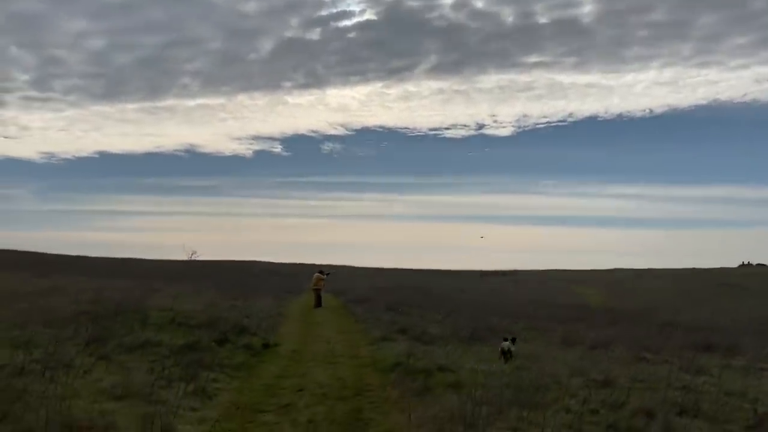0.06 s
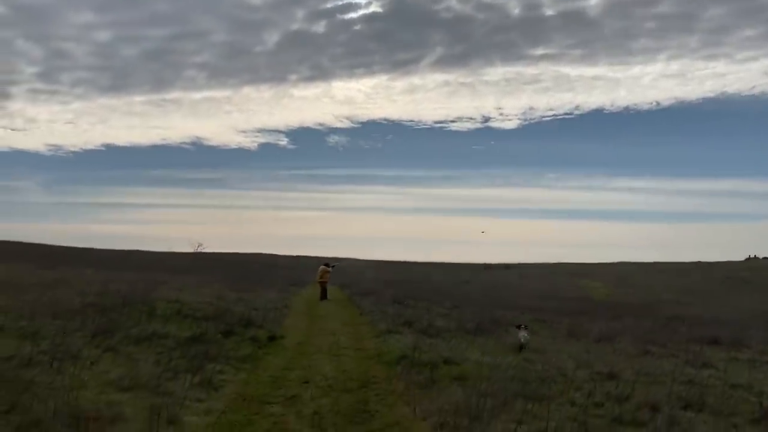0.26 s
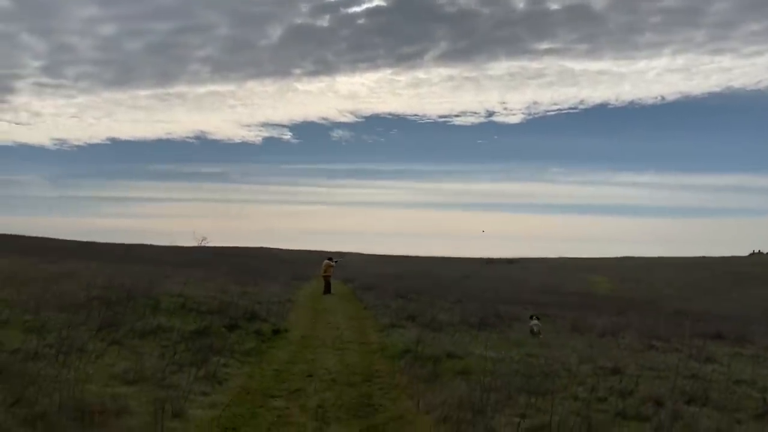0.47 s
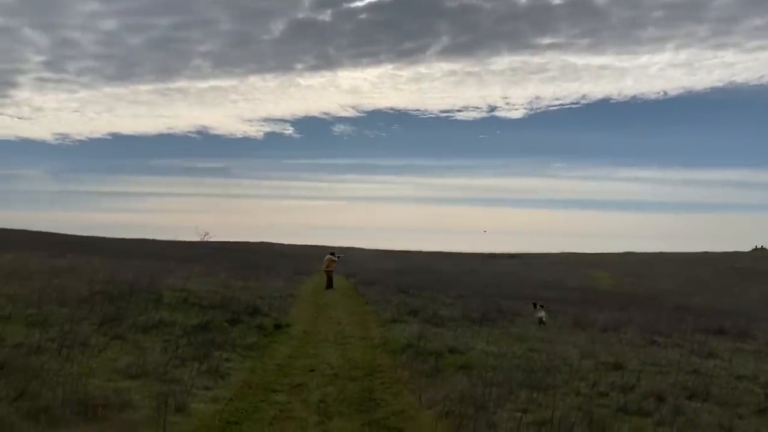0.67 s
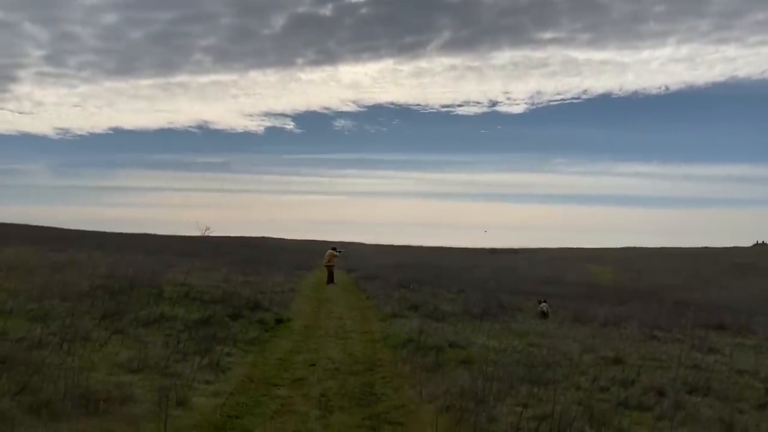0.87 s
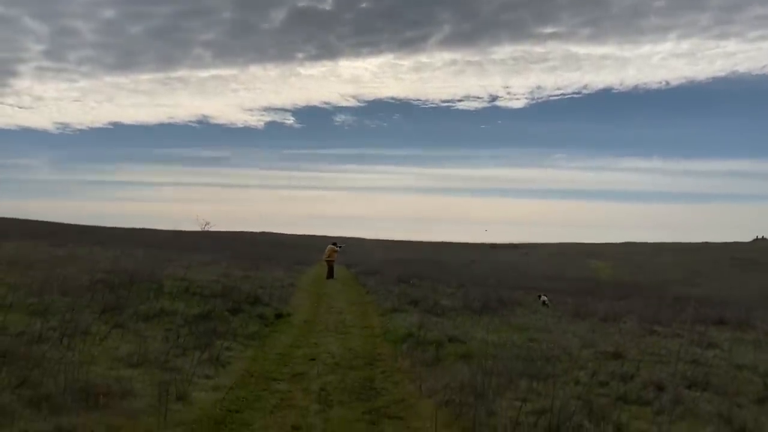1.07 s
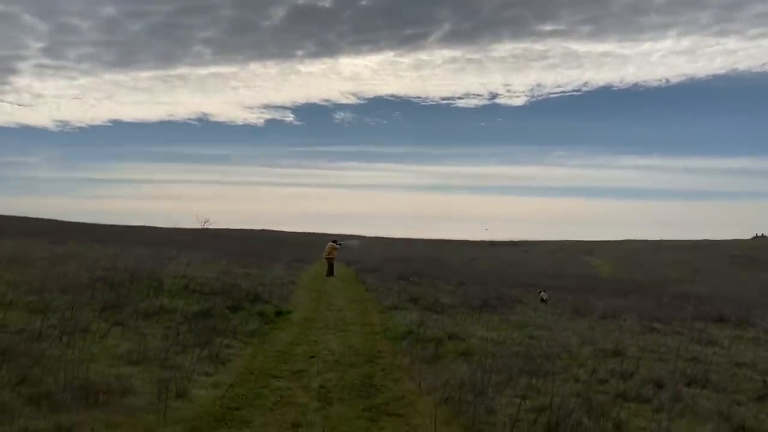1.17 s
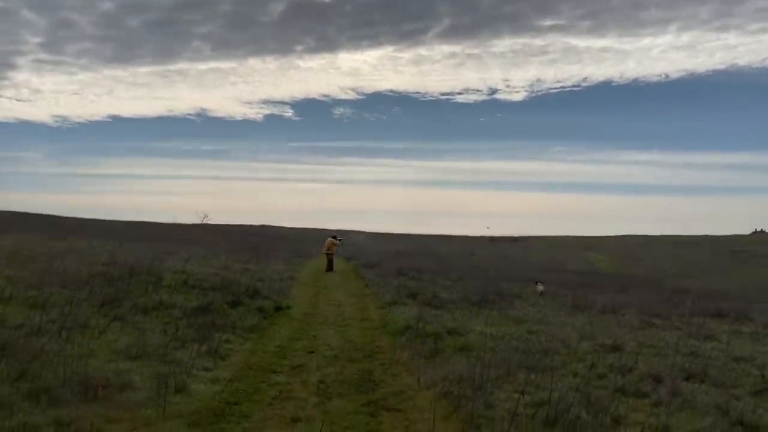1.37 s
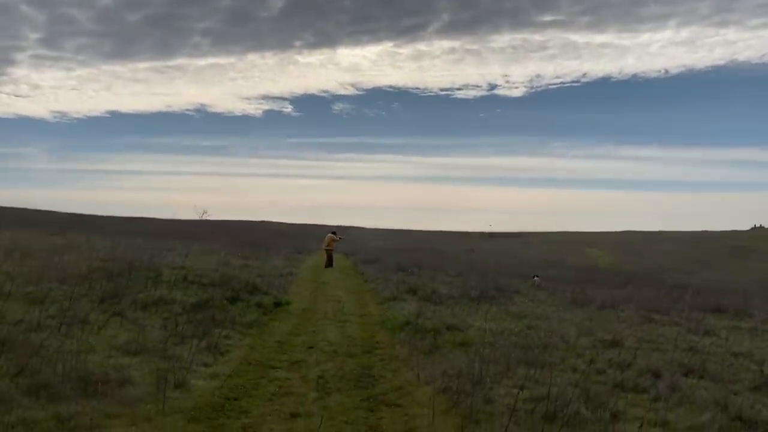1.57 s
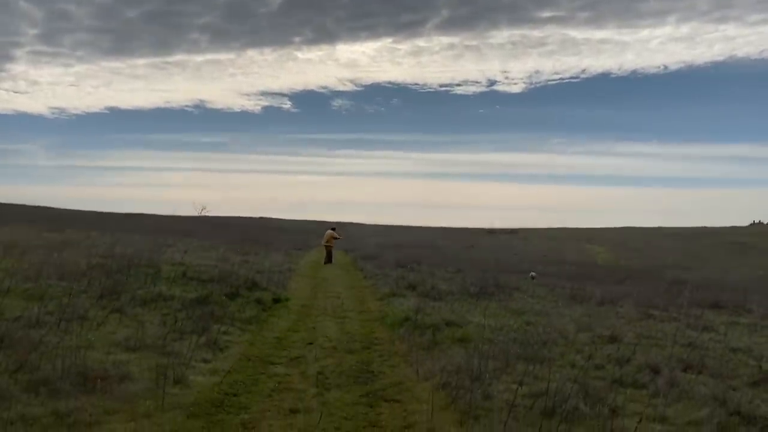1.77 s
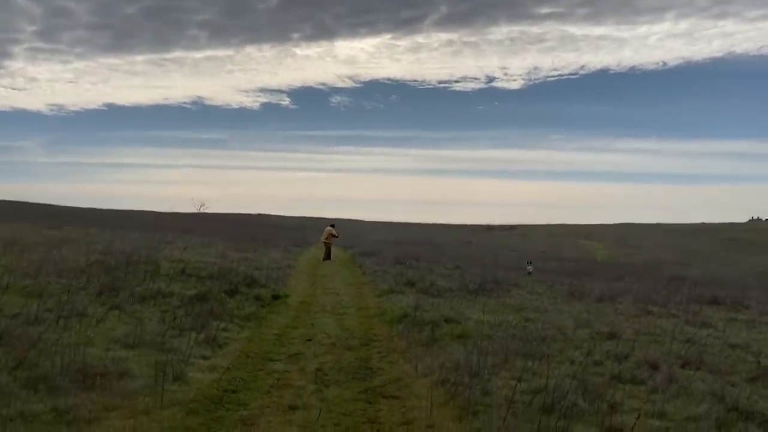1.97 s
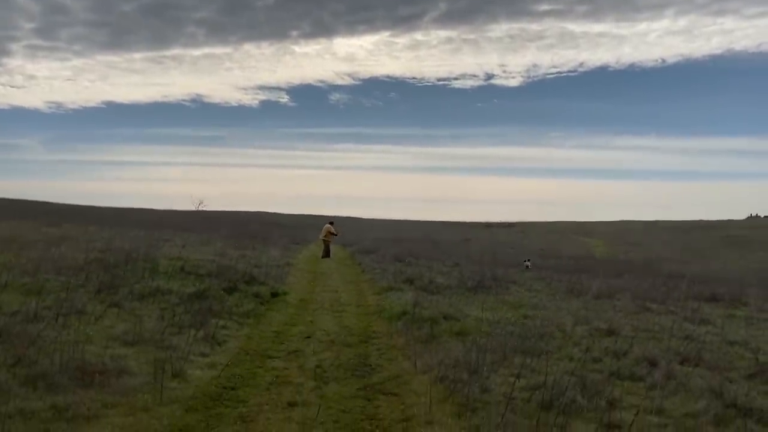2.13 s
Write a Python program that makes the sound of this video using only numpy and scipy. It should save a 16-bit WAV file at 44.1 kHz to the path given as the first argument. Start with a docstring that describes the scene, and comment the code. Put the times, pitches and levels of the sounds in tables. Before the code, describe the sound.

Two shotgun blasts, about one second apart, some tens of metres away in open grassland; each sharp crack and short low boom fades into hiss and faint echoes, with light wind on a small stereo recorder.

```python
"""Open grassland: two shotgun blasts some tens of metres away, heard by a small stereo recorder.
Each is a pressure pulse, a crack of shaped noise and a chirp-like boom that falls in pitch; swelling
narrow-band noise precedes it. Decaying noise gives the hiss from grass, low rumble and dull roll; short noise
bursts give the slap echoes. Low noise in lumps makes the wind on the microphones; filtered noise makes the
murmur, rustles and ticks."""
import sys
import numpy as np
from scipy import signal
from scipy.fft import rfft, irfft
from scipy.io import wavfile
from scipy.ndimage import uniform_filter1d

SR = 44100
rng = np.random.default_rng(int(sys.argv[2]) if len(sys.argv) > 2 else 0)


def invert_db(x):
    """Field ratio 10**(x/20) for x, a level in decibels (scalar or array-like)."""
    u = np.asarray(x, float) / 20
    return 10 ** u


def int16_out(signal):
    """Quantize to a 16-bit WAV file."""
    q = np.round(np.clip(np.atleast_2d(signal).T, -1, 1) * 32767)
    wavfile.write(sys.argv[1], SR, q.astype(np.int16))


N = 97020  # samples
OPPOSED = np.array([[1], [-1]])  # signs of the opposed part, left and right


def bins():
    """Discrete Fourier analysis: the bin frequencies in Hz, raised by 1 to avoid zero."""
    return np.fft.rfftfreq(N, 1 / SR) + 1


def colour(x, table):
    """Linear filtering: weight the spectrum by (Hz, dB) points joined on a log frequency axis."""
    hz, db = np.array(table, float).T
    weight = invert_db(np.interp(np.log(bins()), np.log(hz), db))
    return irfft(rfft(x) * weight, N)


def band(x, hz, width_hz):
    """Resonance: the magnitude response of one resonator applied twice, without phase shift."""
    f = bins()
    detuning = (f - hz ** 2 / f) / width_hz
    return irfft(rfft(x) / (1 + detuning ** 2), N)


def unit(x):
    """Normalization by energy: scale to rms 1."""
    return x / np.sqrt(np.mean(x ** 2))


def pair(side_db):
    """Partial coherence: left and right noise from a shared part and an opposed part."""
    mid, side = rng.standard_normal((2, N))
    return mid + invert_db(side_db) * side * OPPOSED


def pan(db):
    """Level difference between channels: gains for left minus right in dB."""
    return invert_db(OPPOSED * db / 2)


def walk(rate):
    """Slow random modulation: levels held 1 / rate s, slewed twice, at rms 1."""
    hold = int(SR / rate)
    steps = np.repeat(rng.standard_normal(N // hold + 1), hold)
    return unit(uniform_filter1d(uniform_filter1d(steps, hold), hold)[:N])


def curve(t, table):
    """Envelope: gain from (s, dB) rows joined by straight lines in dB."""
    rows = np.array(table, float)
    return invert_db(np.interp(t, rows[:, 0], rows[:, 1]))


# Level of the distant field murmur. Each row: time in seconds, level in dB.
MURMUR_LEVEL = [(0, -62.5), (.1, -59), (.22, -64.5), (.5, -72.5), (.9, -81), (1.05, -78), (1.2, -76),
                (1.9, -72.5), (2.15, -72.5), (2.2, -76)]
# Spectrum of the murmur. Each row: frequency in Hz, weight in dB per Hz.
MURMUR_COLOUR = [(150, -6.5), (250, -4), (400, -6.5), (900, -14), (1400, -26), (2500, -34.5), (6000, -39.5),
                 (9000, -50), (12000, -43.5), (15000, -50.5)]


def murmur(t):
    """Amplitude modulation: coloured noise of the open field whose level wavers slowly."""
    waver_db, waver_hz = 2.2, 8.9
    noise = unit(colour(pair(-5.5), MURMUR_COLOUR))
    return noise * curve(t, MURMUR_LEVEL) * invert_db(waver_db * walk(waver_hz))


# Grass rustles. Each row: centre time in seconds, length in seconds, level in dB, centre frequency in Hz.
RUSTLES = [(0.028, 0.033, -81, 9000), (0.105, 0.054, -78.5, 9000), (.19, .04, -80, 11000),
           (0.795, 0.1, -79.5, 9000), (0.944, 0.053, -68.5, 6000), (1.903, 0.083, -88.5, 3500),
           (2.08, 0.13, -89.5, 2975)]


def rustles(t):
    """Granular noise: randomly louder grains of 40 samples under Gaussian swells."""
    grain_db = 2.6
    noise = pair(-4)
    grain_level = rng.exponential(size=N // 40 + 1).repeat(40)[:N]
    grains = noise * invert_db(grain_db * grain_level)
    out = 0
    for s, length, db, hz in RUSTLES:
        swell = np.exp(-((t - s) / length * 2) ** 2)
        out = out + invert_db(db) * swell * unit(band(grains, hz, 0.97 * hz))
    return out


# Grass ticks. Each row: start in seconds, level in dB before a common trim.
TICKS = [(0.1128, -63), (0.1757, -54.5), (0.7174, -60.5), (0.7582, -52), (0.7944, -63), (0.933, -65.5),
         (0.9514, -73), (1.1493, -76), (1.181, -60.5), (2.0782, -62), (2.095, -68.5)]


def ticks(t):
    """Impulsive excitation: wide-band noise starts at once and decays exponentially."""
    t60_s, hz, width_hz, trim_db = 0.0063, 9000, 15000, -4.5
    snap = unit(band(pair(1.5), hz, width_hz))
    out = 0
    for s, db in TICKS:
        decay = (t > s) * np.exp(-np.log(1000) * np.abs(t - s) / t60_s)
        out = out + invert_db(db + trim_db) * decay * snap
    return out


# Wind level, in three consecutive lists. Each row: time in seconds, level in dB.
GUSTS = [
    [(0.0, -52), (0.02, -55.5), (0.032, -77), (0.084, -87), (0.094, -64.5), (0.11, -60.5), (0.124, -65),
     (0.146, -54.5), (0.2, -50.5)],
    [(0.32, -59.5), (0.394, -58), (0.414, -51.5), (0.634, -60.5), (0.648, -73), (0.742, -67), (0.81, -49),
     (0.874, -72), (0.948, -53), (1.014, -60.5), (1.166, -51), (1.21, -52)],
    [(1.31, -48), (1.374, -56), (1.488, -44.5), (1.534, -53), (1.694, -52.5), (1.718, -44.5),
     (1.846, -57.5), (2.066, -60), (2.112, -55.5), (2.154, -72), (2.172, -51.5), (2.2, -47.5)],
]
# Spectrum of the wind below 800 Hz. Each row: frequency in Hz, weight in dB per Hz.
WIND_COLOUR = [(15, -43.5), (25, -13.5), (73, -3.5), (134, -10.5), (216, -26.5), (257, -38.5), (303, -30.5),
               (400, -45), (520, -71), (880, -120)]


def wind(t):
    """Turbulent pressure at the microphones: low noise in lumps, mostly alike on both sides."""
    side_db, flutter_db, flutter_hz = -11, 2, 25
    lumps = pair(side_db) * invert_db(flutter_db * walk(flutter_hz))
    # the added point holds everything above 800 Hz at -66 dB
    return unit(colour(lumps, WIND_COLOUR + [(800, -66)])) * curve(t, sum(GUSTS, []))


def rumble(t):
    """Exponential decay: low scattered noise lingers after the boom."""
    level_db, hz, width_hz, t60_s = -53, 185, 120, 0.99
    fade = (t > 0) * invert_db(-60 * np.maximum(t, 0) / t60_s)
    return invert_db(level_db) * fade * unit(band(pair(-11.5), hz, width_hz))


def roll(t, db):
    """Delayed diffuse reflection: a far slope throws back a dull swell with Gaussian flanks."""
    start_s, rise_s, hold_s, fall_s = 0.22, 0.1, 0.1, 0.073  # start counts from the shot
    hz, width_hz, pan_db, waver_db = 667, 624, -5.5, 1.8
    peak = start_s + rise_s
    rising = np.minimum(t - peak, 0) / rise_s
    falling = np.maximum(t - peak - hold_s, 0) / fall_s
    shape = np.exp(-rising ** 2 - falling ** 2)
    level = invert_db(db + waver_db * walk(30.2))
    return level * shape * unit(band(pair(-1.1), hz, width_hz)) * pan(pan_db)


# Slap echoes. Each row: start in seconds, level in dB, centre frequency in Hz, decay constant in seconds.
ECHOES = [(0.411, -46.5, 1770, 0.0023), (0.85, -69, 2160, 0.03), (1.413, -53, 1250, 0.0056),
          (1.851, -60.5, 1630, 0.0078), (1.852, -61, 2540, 0.013)]


def echoes(t):
    """Delayed reflection: hard things far off return short, decaying bursts of band noise."""
    out = 0
    for s, db, hz, length in ECHOES:
        decay = (t > s) * np.exp(-np.abs(t - s) / length)
        out = out + invert_db(db) * decay * unit(band(pair(-6), hz, 0.5 * hz))
    return out


# Level of the scattered hiss. Each row: time after the shot in seconds, level in dB.
SCATTER_LEVEL = [(0, -37), (.012, -53), (.03, -49), (.07, -51), (.16, -56.5), (.23, -62.5), (.28, -62.5),
                 (.34, -59), (.42, -66.5), (.56, -71.5), (.72, -72.5), (.8, -98), (1, -110)]
# Spectrum of its shared part. Each row: frequency in Hz, weight in dB per Hz.
SCATTER_COLOUR = [(150, -34.5), (250, -5), (1050, -11.5), (1760, -24.5), (1950, -18), (7130, -14.5),
                  (8180, -18.5), (8620, -49), (10200, -21.5), (12000, -17.5), (14000, -25.5), (15500, -69)]
# Spectrum of its opposed part. Each row: frequency in Hz, weight in dB per Hz.
SCATTER_SIDE_COLOUR = [(150, -36), (250, -5.5), (795, -3), (1610, -10.5), (1760, -5.5), (2440, -14.5),
                       (2710, -9.5), (8920, -2.5), (11200, -9.5), (11800, -44.5), (13000, -23), (15500, -7)]


def scatter(t):
    """Backscatter and air absorption: hiss returns from ever farther grass, dulled on the way."""
    side_db, air_db_per_s_at_10k, waver_db, waver_hz = -2.5, 30.5, 1.1, 25
    mid = unit(colour(rng.standard_normal(N), SCATTER_COLOUR))
    side = unit(colour(rng.standard_normal(N), SCATTER_SIDE_COLOUR))
    spectrum = rfft(mid + invert_db(side_db) * side * OPPOSED)
    after = np.maximum(t, 0)
    out = 0
    for hz in 250 * 2. ** np.arange(7):  # overlapping octave bands
        part = irfft(spectrum * np.clip(1 - np.abs(np.log2(bins() / hz)), 0, 1), N)
        loss_db = air_db_per_s_at_10k * (hz / 10000) ** 2 * after  # grows as frequency squared
        out = out + part * invert_db(waver_db * walk(waver_hz) - loss_db)
    return out * curve(t, SCATTER_LEVEL) * (t > 0)


# Narrow bands of noise that swell just before each crack and stop.
# Each row: end in seconds, frequency in Hz, level in dB, left minus right in dB.
LEAD = [(0.2431, 1866, -16, 13), (0.2423, 2957, -17.5, 11), (.2443, 5100, -26, 4.5), (.2443, 7200, -40, 0),
        (0.2423, 300, -26.5, 9.5), (0.2435, 803.7, -32, 6), (1.2452, 3384, -25.5, 4.5),
        (1.2448, 2227, -35, 4.5), (1.2438, 917, -38, 0.5), (1.2448, 5125, -36.5, 3.5),
        (1.2445, 7400, -41.5, 2)]


def lead_in(t):
    """Narrow-band noise under a rising exponential: bands swell just before each crack and stop."""
    rise_db_per_s, width_hz, length_s = 1298, 280, 0.023
    out = 0
    for s, hz, db, pan_db in LEAD:
        opening = np.clip(1 + (t - s) / length_s, 0, 1) ** .5
        swell = invert_db(rise_db_per_s * np.minimum(t - s, 0)) * opening * (t < s)
        out = out + invert_db(db) * swell * unit(band(pair(-5), hz, width_hz)) * pan(pan_db)
    return out


def shock(t, direct_db, bounce_db):
    """Shock wave and ground reflection: a falling pressure ramp, its overshoot and a later copy."""
    length_s, bounce_s, highpass_hz = 0.00067, 0.003, 300
    rebound = 0.35  # overshoot as a share of the peak

    def front(u):
        """N-wave: pressure falls straight from 1 to -1, then a positive overshoot dies away."""
        ramp = np.where((u >= 0) & (u < length_s), 1 - 2 * u / length_s, 0.)
        return ramp + rebound * np.clip(2 - u / length_s, 0, 1) * (u >= length_s)

    pulse = invert_db(direct_db) * front(t) + invert_db(bounce_db) * front(t - bounce_s)
    return colour(pulse, [(highpass_hz / 4, -20), (highpass_hz, 0), (7000, 0), (12000, -8)])


# Spectrum of the crack. Each row: frequency in Hz, weight in dB per Hz.
CRACK_COLOUR = [(240, -32.5), (400, -10), (1170, 3.5), (1740, -12.5), (3680, -8), (4350, -5.5),
                (5820, -21.5), (6480, -6), (8930, -33), (13300, -28), (15500, -49.5)]


def crack(t):
    """Turbulence noise: coloured noise with an exponential rise, brief hold and fast decay."""
    rise_s, hold_s, t60_s, side_db = .0006, .004, .013, -7
    rise = np.minimum(t, 0) / rise_s
    decay = np.log(1000) * np.maximum(t - hold_s, 0) / t60_s
    return np.exp(rise - decay) * unit(colour(pair(side_db), CRACK_COLOUR))


def boom(t, pan_db):
    """Lengthening oscillation: each cycle lasts a fixed ratio longer, over a slow push of air."""
    clock_s, first_crest_s, stretch = .003, .001, 1.8
    start_s, rise_s, hold_s, fall_power, end_s = 0.00067, 0.0057, 0.0091, 2.3, .035
    push_db, push_peak_s, left_lag_s = -21, .013, .0002
    after = np.maximum(t - left_lag_s * np.array([[1], [0]]), 0)
    turns = np.log((after + clock_s) / (first_crest_s + clock_s)) / np.log(stretch)
    onset = np.clip((after - start_s) * 4000, 0, 1)
    growth = (0.67 + np.minimum(after / rise_s, 1)) / 2.6
    decay = np.exp(-(after / end_s) ** 2) / (1 + (after / hold_s) ** fall_power)
    push = invert_db(push_db) * (after / push_peak_s * np.exp(1 - after / push_peak_s)) ** 2
    return (onset * growth * decay * np.cos(2 * np.pi * turns) + push) * pan(pan_db)


def blast(t, shock_db, bounce_db, crack_db, boom_db, pan_db):
    """Superposition of shock, crack and boom; t counts from the shock front."""
    return shock(t, shock_db, bounce_db) + invert_db(crack_db) * crack(t) + invert_db(boom_db) * boom(t, pan_db)


# The two shots. Each row: start in seconds, gains of shock, ground bounce, crack and boom in dB,
# boom left minus right in dB.
SHOTS = [(.2443, -1.5, -25.5, -19, -6, 4), (1.2448, -3.5, -6, -11.5, -9, 0.4)]


def scene():
    """Linear superposition: both shots with their returns, over wind and grass."""
    t = np.arange(N) / SR
    out = wind(t) + murmur(t) + rustles(t) + ticks(t) + echoes(t) + lead_in(t)
    for (s, *levels), roll_db in zip(SHOTS, (-60, -66)):
        since = t - s
        out = out + blast(since, *levels) + scatter(since) + roll(since, roll_db) + rumble(since)
    return out


# Microphone response to the shared part, dipping near 9 kHz. Each row: frequency in Hz, gain in dB.
MIC_SHARED = [(20, -6), (60, 2), (8000, 0), (9200, -10.5), (10500, 2.5), (14200, 3), (15000, -13.5),
              (16300, -45)]
# Microphone response to the opposed part, dipping higher up. Each row: frequency in Hz, gain in dB.
MIC_OPPOSED = [(20, -6.5), (60, 1), (7000, 1.5), (9500, 3.5), (11000, 0.5), (12300, -8.5), (14000, 0.5),
               (15500, -9.5), (16500, -44)]


def microphones(dry):
    """Frequency response: the shared and opposed parts are coloured separately."""
    mid = colour((dry[0] + dry[1]) / 2, MIC_SHARED)
    side = colour((dry[0] - dry[1]) / 2, MIC_OPPOSED)
    return mid + side * OPPOSED


def top_cut(x):
    """Nothing passes above the cut-off."""
    return signal.sosfilt(signal.butter(12, 16380, fs=SR, output="sos"), x)


def record(dry):
    """Saturation: the microphone signal bends softly at high level."""
    mix = np.tanh(microphones(dry) / 1.135) * 1.062
    return top_cut(mix)


dry = scene()
out = record(dry)
int16_out(out)
```